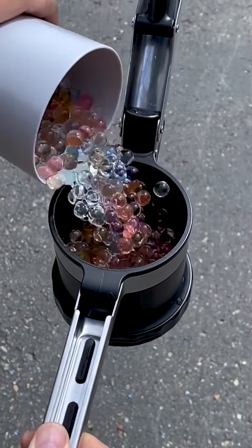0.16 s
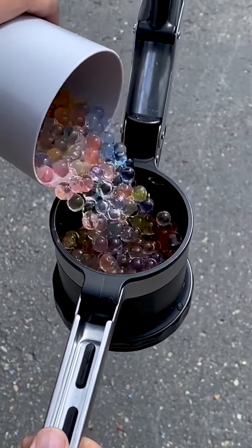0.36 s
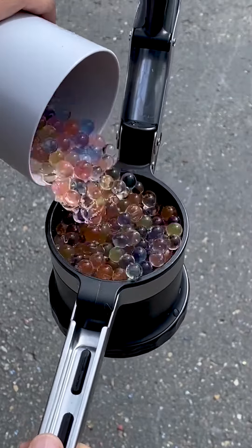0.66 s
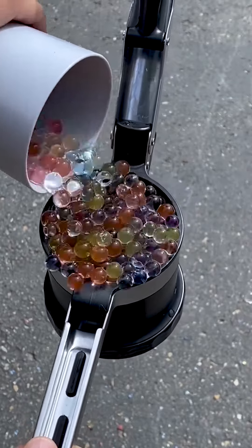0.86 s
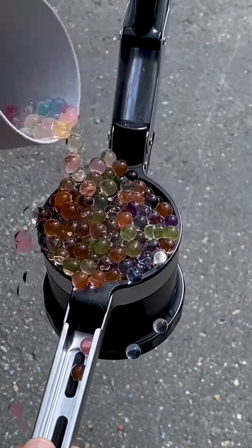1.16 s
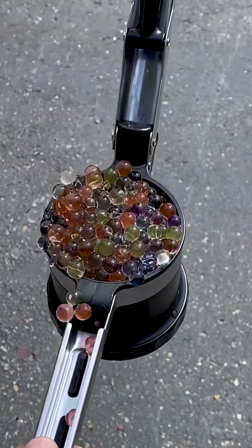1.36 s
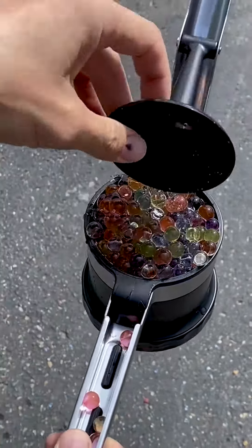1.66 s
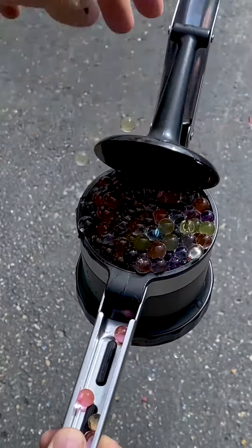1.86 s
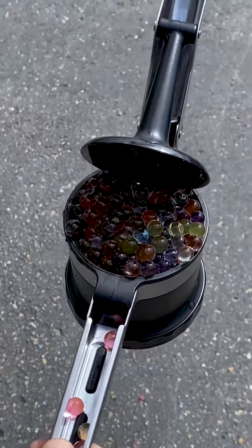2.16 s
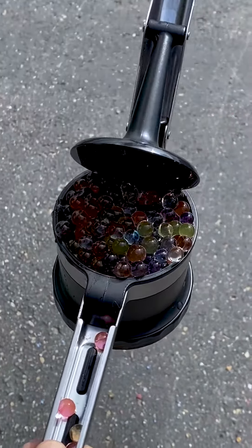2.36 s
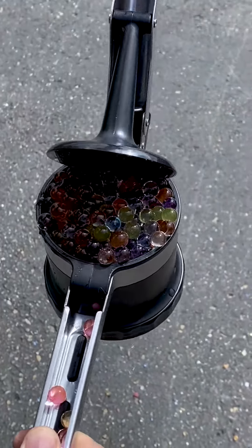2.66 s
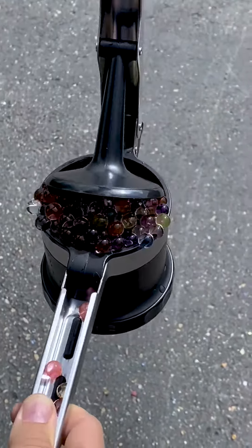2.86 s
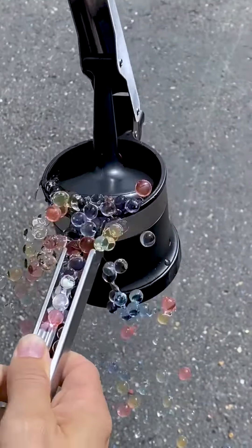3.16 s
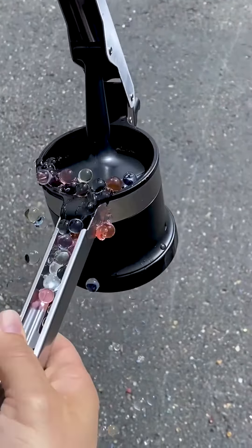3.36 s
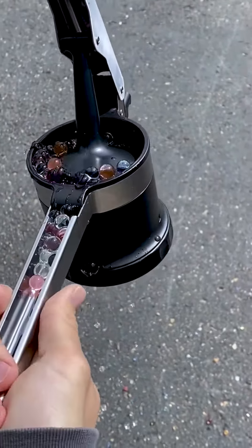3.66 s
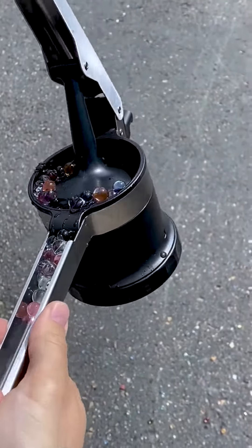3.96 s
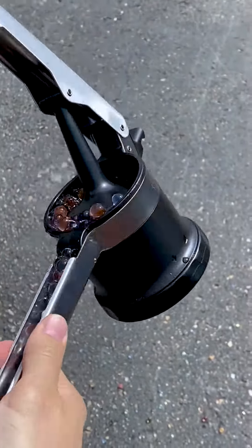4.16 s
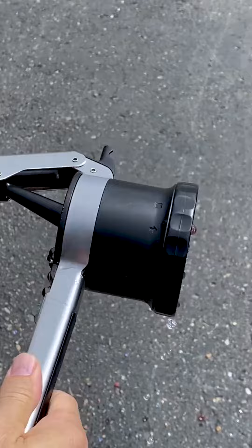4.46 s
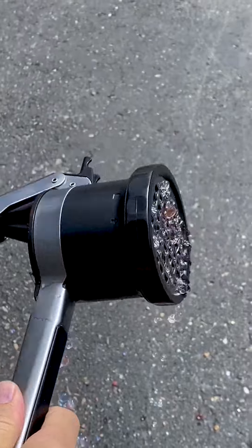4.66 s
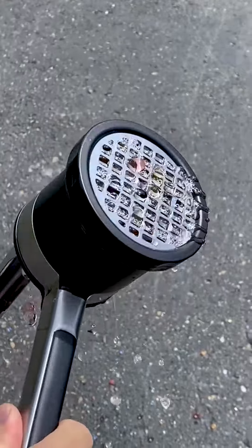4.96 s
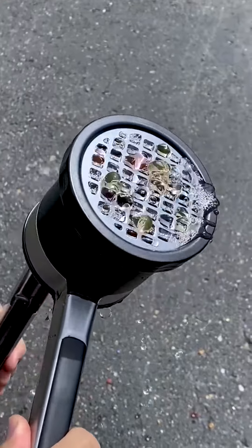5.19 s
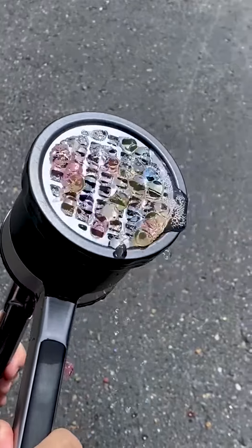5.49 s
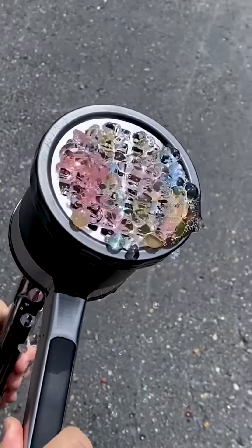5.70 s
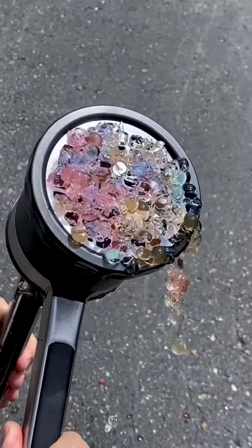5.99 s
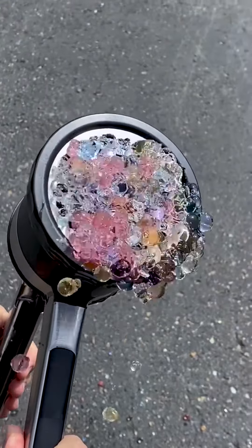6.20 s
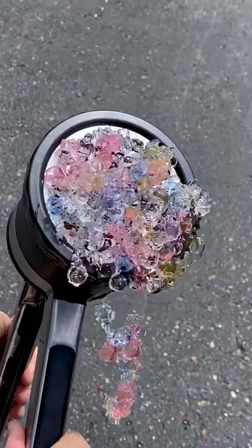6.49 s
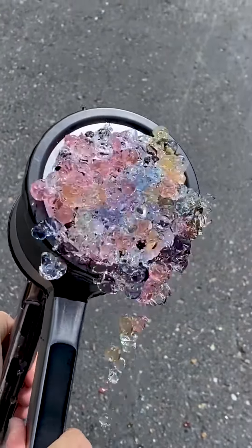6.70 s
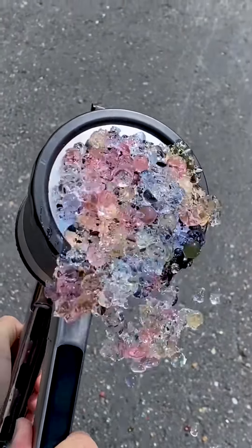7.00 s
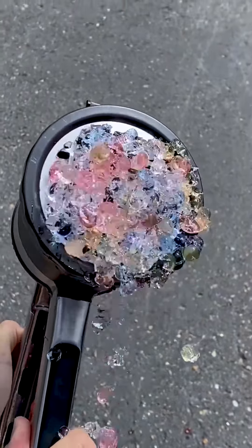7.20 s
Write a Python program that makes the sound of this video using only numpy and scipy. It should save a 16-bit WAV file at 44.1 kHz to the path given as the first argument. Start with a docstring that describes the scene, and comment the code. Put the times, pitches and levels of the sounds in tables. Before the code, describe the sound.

Close-up outdoors: a brief rattling pour of slick beads, a plastic knock, a small spill, then dense wet crackling and sharp snaps as they are squeezed.

```python
"""Wet gel beads are poured from a cup into a hand press, outdoors, close to a phone: ticks, pops and plops
over rumble and a far wash. A faint bird whistles and low thuds sound; the plunger knocks into place and
spills some beads. Then the rest are forced through the sieve and burst with a dense crackle and sharp pops.
Beads are swarms of damped bubbles; pops are noise bursts; knocks ring the press; rumble and air are noise."""
import sys
import numpy as np
from scipy import signal
from scipy.fft import rfft, irfft
from scipy.io import wavfile
from scipy.ndimage import uniform_filter1d

SR = 44100
rng = np.random.default_rng(int(sys.argv[2]) if len(sys.argv) > 2 else 0)


def wav_out(sig):
    """Save sig, one row per channel (or a flat mono array), as 16-bit PCM at SR to the path in sys.argv[1]."""
    wavfile.write(sys.argv[1], SR, np.round(np.clip(np.atleast_2d(sig).T, -1, 1) * 32767).astype(np.int16))


N = 323694
HZ = np.fft.rfftfreq(N, 1 / SR)
T = np.arange(N) / SR

# Loose beads on the move: poured, jostled by the plunger, spilling over the rim.
# Each row: start in seconds, length in seconds, wet body in relative dB, fine ticks in relative dB.
FLOWS = [(0, 0.13, -72, -64), (.11, 0.62, -51, -54), (.8, .14, -59, -63.5), (.96, 0.099, -75.5, -72),
         (1.36, 0.16, -68.5, -66.5), (1.84, 0.22, -75, -81), (2.25, 0.2, -83, -77),
         (2.85, 0.28, -70.5, -70.5), (3.12, .21, -61, -60), (3.36, 0.26, -64, -68), (4.5, 0.064, -68, -79)]
FLOW_RISE, FLOW_FALL = 0.21, 0.11  # shares of a flow's length
SETTLING_DB = -87  # beads shifting at rest
# Colours of loose and of crushed beads. Each row: frequency in Hz, relative density in dB per Hz.
POUR_COLOUR = [(500, -57), (900, -5), (1250, 4), (2000, 4), (2900, 7.5), (4000, -1.5), (5600, 0.5),
               (7600, -5), (11000, -2), (13000, -11.5), (16000, -7)]
CRUSH_COLOUR = [(500, -21), (1000, -15.5), (1600, -5), (2600, 1.5), (4000, -0.5), (5600, 0), (7600, -2),
                (11000, -5.5), (13000, -6), (16000, -10)]
# Colour of the fine hiss. Each row: frequency in Hz, relative density in dB per Hz.
FIZZ_COLOUR = [(1000, -25), (2500, -4), (5500, -3), (7600, -4.5), (11000, -3.5), (15000, -1.5)]

# Buffeting in light air and in heavy gusts. Each row: frequency in Hz, relative density in dB per Hz.
RUMBLE_COLOUR = [(15, -28), (30, -15), (48, -1), (85, 1), (115, -8), (170, -16.5), (260, -27), (500, -50),
                 (1000, -86)]
GUST_COLOUR = [(15, -31), (30, -4.5), (48, -1.5), (70, 0), (100, -8), (150, -25.5), (260, -32), (1000, -99)]
# Depth of the buffeting. Each row: time in seconds, share from 0 (light air) to 1 (heavy gusts).
GUSTY = [(0, 0.13), (1.3, 0.32), (2.3, .55), (3.4, 0.04), (4.4, .04), (5.1, 0.51), (6.5, .95), (7.34, 0.92)]
# Gusts buffeting the microphone. Each row: start in seconds, length in seconds, level in dB.
GUSTS = [(1.2, .12, -59), (1.35, 0.16, -51), (1.64, .1, -48.5), (1.78, 0.11, -53.5), (1.96, .18, -45),
         (2.24, .18, -43.5), (2.87, .15, -61.5), (3.67, .25, -55.5), (5.07, 0.23, -56), (5.43, 0.14, -55),
         (6.43, .15, -48), (6.72, 0.13, -55.5), (6.94, 0.082, -52.5), (7.1, 0.19, -54.5)]
GUST_RISE, GUST_FALL, CALM_DB = 0.34, 0.23, -64.5  # shares of a gust's length; the air between gusts

# Level of the distant outdoors. Each row: time in seconds, relative level in dB.
AIR = [(0.0, -78.5), (0.31, -80.5), (2.41, -76), (2.51, -71.5), (3.0, -78), (3.49, -79), (3.64, -71),
       (4.17, -77), (7.34, -78)]
# Colour of the distant outdoors. Each row: frequency in Hz, relative density in dB per Hz.
AIR_COLOUR = [(60, -15.5), (200, 8.5), (400, 4.5), (700, 3), (1100, 0.5), (1600, -8.5), (2500, -11),
              (5000, -18), (8000, -30), (15000, -22)]

# The loudest beads that snap or burst.
# Each row: time in seconds, level in dB as if spread over 1 ms, cavity pitch in Hz, nominal length in ms.
POPS = [(.1106, -35.5, 6000, 1.4), (.1532, -35.5, 3200, 2.4), (.16, -31.5, 4600, 1.8),
        (.2298, -38, 2620, 2.6), (.2887, -34.5, 2620, 2), (.3329, -28, 9050, .9), (.709, -36, 2900, 2.8),
        (.7746, -35, 2970, 3.8), (.8, -35, 5020, 3.5), (1.207, -48, 8500, 2.4), (1.505, -47.5, 3720, 1.6),
        (1.8694, -42, 5600, .4), (2.2235, -47, 8000, .3), (2.3814, -43, 8500, .2), (2.395, -44, 8000, .3),
        (2.459, -44, 9000, 0.3), (2.616, -53.5, 2700, 0.71), (3.09, -37.5, 5500, 0.3),
        (3.1041, -33, 4960, .65), (3.3, -45, 2720, 2.3), (3.3417, -40, 6000, 1.2),
        (3.5387, -32.5, 5770, 0.64), (3.6094, -32, 5030, 0.48), (3.7263, -32, 4760, 2.9),
        (3.7734, -36, 5500, 0.62), (3.862, -41, 5460, 0.54), (3.9093, -30.5, 5550, 0.59),
        (3.9593, -39.5, 8500, .4), (4.0064, -33, 5550, 0.74), (4.065, -38, 6500, .25),
        (4.168, -46.5, 7000, 0.49), (4.2828, -33.5, 5700, 0.4), (4.6289, -35.5, 6000, 1.1),
        (4.6614, -40.5, 7500, .6), (4.7365, -37, 5000, 0.95), (4.8015, -30.5, 7000, 1.2),
        (4.8095, -32, 7000, 1), (4.866, -29.5, 7500, 0.95), (4.9446, -29.5, 7000, .8),
        (5.064, -31, 7000, 0.72), (5.0677, -20.5, 7000, .63), (5.1706, -30.5, 6560, .5),
        (5.322, -34, 3930, 0.54), (5.3576, -30.5, 5050, 1.8), (5.4088, -28, 5540, 2.4),
        (5.4315, -27, 5470, 4.3), (5.5607, -34, 2830, 2.5), (5.5873, -30, 7500, .45),
        (5.6637, -25, 7000, 1), (5.8669, -17.5, 7500, 1.6), (5.8714, -16.5, 4180, 0.75),
        (5.939, -32, 2200, 1.1), (5.9424, -22, 6850, 1.8), (6.019, -32, 3840, 2.8),
        (6.0605, -26.5, 5600, .8), (6.1849, -22.5, 7940, 2.5), (6.214, -31.5, 5230, 0.79),
        (6.2456, -26, 6000, 2.1), (6.2746, -28.5, 4170, 2.8), (6.3542, -26, 5900, .4),
        (6.4622, -23, 9000, 3.4), (6.5095, -34, 3600, 4), (6.5162, -22, 7040, 1),
        (6.7336, -32.5, 5030, 2.2), (6.82, -28, 7600, 0.27), (6.9867, -30, 3900, 0.2),
        (7.0014, -17, 2620, 2.6), (7.0026, -18.5, 4410, 3.2), (7.0406, -26, 5800, .63),
        (7.2537, -32, 3300, 1.4), (7.2674, -22.5, 2060, .7)]
# Higher-pitched beads put more of their burst into spray: pitch of equal shares, and slope.
EVEN_SPRAY_HZ, SPRAY_DB_PER_HZ = 5960, 0.01
STRAYS_PER_S, STRAY_HZ, STRAY_OCTAVES, STRAY_MS = 19, 6200, 0.45, 0.5
STRAY_DB, STRAY_SPREAD_DB, STRAY_LEAST_DB = 13, 2.5, -65  # above the stir; random spread; floor
# Air pockets closing between wet beads.
# Each row: time in seconds, relative level in dB, starting pitch in Hz, t60 in seconds.
PLOPS = [(.133, -35, 3870, 0.013), (.2622, -23, 1085, .033), (.3165, -32, 1150, 0.024),
         (.41, -31.5, 4070, 0.017), (.449, -17.5, 1140, .013), (.462, -19, 1720, .0097),
         (.4785, -20, 1366, 0.024), (.519, -31.5, 1970, .023), (.523, -28, 1390, 0.013),
         (.666, -41, 1220, .027), (.738, -38.5, 1195, 0.024), (.832, -29, 2830, 0.011),
         (.892, -35, 4180, .013), (4.213, -39.5, 3400, .012), (6.024, -32, 2440, .031),
         (6.155, -32.5, 3680, .022), (6.2885, -29.5, 1000, .015), (6.389, -31.5, 3000, .012)]

# A faint, far bird.
# Each row: start in seconds, length in seconds, mean level in dB, first pitch in Hz, last pitch in Hz.
BIRD = [(1.16, .08, -80.5, 4500, 4550), (1.255, 0.08, -80, 4500, 4490), (1.37, 0.1, -78, 4560, 4570),
        (1.55, 0.15, -82, 4510, 4410), (1.8, .06, -80, 4950, 4600), (1.93, .05, -77, 5150, 4800),
        (2.068, .06, -78, 5100, 4700)]
# Dull bumps. Each row: time in seconds, relative level in dB, starting pitch in Hz, t60 in seconds.
THUDS = [(1.38, -21.5, 88.5, 0.15), (1.435, -26, 153, 0.084), (1.452, -22.5, 53, 0.12),
         (1.988, -31, 146, 0.11), (2.052, -25, 53.8, 0.29), (2.056, -25, 107.3, 0.14),
         (3.705, -42, 209.8, 0.56), (3.70, -49, 290, .2), (3.785, -55, 82.7, 0.4), (6.97, -33.5, 58, 0.23)]
# The plunger meets the rim. Each row: time in seconds, relative level in dB, nominal contact time in ms.
KNOCKS = [(1.85, -57, .1), (1.9041, -26, 0.075), (1.989, -37.5, .15), (2.016, -41, 0.074),
          (2.029, -50.5, 0.3), (2.651, -46, 0.47)]
# Modes of the press. Each row: frequency in Hz, relative level in dB, t60 in seconds.
PRESS = [(443, -17.5, 0.066), (710, -10.5, 0.05), (1086, 2, 0.032), (1295, -16, 0.22), (1433, -7, 0.032),
         (1716, 0, 0.028), (1770, -32, 0.31), (2336, -27, 0.17), (2370, -8, 0.069), (2620, -6, 0.03),
         (3180, -2, 0.016), (4200, -10, 0.015), (4910, -11, 0.02), (5300, -0.5, 0.015), (6700, -1, 0.0049),
         (10500, 4, 0.0038)]

# The squeeze, as the steady crackle that it drives. Each row: time in seconds, relative level in dB.
EFFORT = [(3.4, -70), (3.55, -66.5), (3.76, -62), (3.86, -64), (4.15, -72), (4.32, -84), (4.55, -85),
          (4.72, -72.5), (4.85, -67), (4.93, -59.5), (5.46, -54), (5.83, -52.5), (6.08, -51), (6.33, -49.5),
          (6.53, -54.5), (7.33, -54)]
EFFORT_TICKS_DB, EFFORT_BODY_DB = 2, -4.5  # relative to the effort
SLIP_DB, SLIPS_PER_S = 1.8, 24  # the beads yield in uneven slips
# A layer of beads gives way in one wet squelch.
# Each row: start in seconds, length in seconds, relative level in dB.
SQUELCHES = [(4.72, 0.22, -60), (5.0, 0.16, -55.5), (5.385, 0.062, -46.5), (5.54, 0.049, -48.5),
             (5.865, .05, -46), (5.935, .025, -44), (5.995, 0.042, -48.5), (6.15, 0.033, -54),
             (6.28, .05, -50), (6.49, 0.036, -49), (6.71, 0.15, -54), (6.9, 0.12, -51), (7.255, .08, -51)]
SQUELCH_RISE, SQUELCH_FALL = 0.21, 0.2  # shares of a squelch's length
SQUELCH_TICKS_DB = -1.5  # relative to its body

# Phase between the microphone ports. Each row: frequency in Hz, nominal lead of the left in radians.
PORTS = [(0, 2), (1400, 0.11), (2700, 0.27), (3700, 0.36), (4650, 1.35), (5400, -0.98), (7060, 3),
         (8180, 3.5), (10400, 7), (11600, 7.5), (14400, 9.5), (16000, 11)]
EDGE_HZ = 16000


def amp(db):
    """Decibels to gain."""
    return 10 ** (np.asarray(db) / 20)


def unit(x):
    """Scales to energy 1."""
    return x / np.sqrt(np.sum(x ** 2) + 1e-30)


def together(a_db, b_db):
    """The level of two unrelated sounds at once."""
    return 10 * np.log10(amp(a_db) ** 2 + amp(b_db) ** 2)


def read(points, hz):
    """Reads a spectrum on a log-frequency axis."""
    f, value = np.transpose(points)
    return np.interp(np.log(hz + 1), np.log(f + 1), value)


def follow(rows):
    """A curve of (time, value) rows, at every sample."""
    return np.interp(T, *np.transpose(rows))


def swells(rows, rise, fall, axis=2):
    """Level in dB of events that rise, hold and die away, in times proportional to their length."""
    power = np.full(N, 1e-14)
    for row in rows:
        age = (T - row[0]) / row[1]
        shape = np.clip(age / rise, 0, 1) * np.exp(-np.maximum(age - 1, 0) / fall)
        power += (amp(row[axis]) * shape) ** 2
    return 10 * np.log10(power)


def add(mix, s, sound):
    """Places a sound at its time, cut at the end."""
    part = mix[max(round(s * SR), 0):][:len(sound)]
    part += sound[:len(part)]


def noise(colour):
    """Coloured noise of rms 1."""
    spectrum = rfft(rng.standard_normal(N)) * amp(read(colour, HZ))
    return np.sqrt(N) * unit(irfft(spectrum, N))


def drift(per_s):
    """A random wander of about unit size, with straight lines between random points."""
    return np.interp(T * per_s, np.arange(4000), rng.standard_normal(4000))


def ring(t, hz, t60, rise_s, glide=0):
    """A damped vibration with a soft start, whose pitch may climb or fall as it dies."""
    envelope = (1 - np.exp(-t / rise_s)) * np.exp(-np.log(1000) * t / t60)
    return envelope * np.sin(2 * np.pi * hz * t * (1 + glide * t / t60))


def rings(rows, rise_s, glide, level_db):
    """One damped vibration for each row."""
    out, t = np.zeros(N), np.arange(SR // 2) / SR
    for s, db, hz, t60 in rows:
        add(out, s, amp(db + level_db) * ring(t, hz, t60, rise_s, glide))
    return out


def band(x, low_hz, high_hz, order=2):
    """A causal band-pass."""
    edges_hz = [low_hz, min(high_hz, SR * .45)]
    return signal.sosfilt(signal.butter(order, edges_hz, "band", fs=SR, output="sos"), x)


def beads(body_db, ticks_db, colour, per_s, cycles, clump_db, sharp_share, spread_db=4.5, count=44):
    """Countless wet contacts: most are tiny bubbles with one pitch each, some sharp ticks excite many."""
    out, t = np.zeros(N), np.arange(900) / SR
    pitches_hz = np.geomspace(700, 16000, count)
    power = amp(read(colour, pitches_hz)) ** 2 * pitches_hz
    high = pitches_hz > 4000
    power /= np.where(high, power[high].sum(), power[~high].sum())

    at, place, size, sign, kind = rng.random((int(per_s * N / SR), 5)).T
    at = (at * (N - 1)).astype(int)
    place = place ** .6  # high pitches far outnumber low ones
    avalanche = amp(clump_db * np.clip(drift(170), -2, 1.6))
    size = amp(spread_db * np.minimum(-np.log(size + 1e-9), 3.5)) * np.sign(sign - .5) * avalanche[at]
    breadth = np.where(kind < sharp_share, 7., .45)  # in pitch steps: sharp tick, or bubble
    for k, hz in enumerate(pitches_hz):
        distance = place * (count + 4) - 2 - k
        reach = np.exp(-(distance / breadth) ** 2) / breadth ** .3 * rng.choice([-1, 1], len(at))
        # low pitches follow the wet body, high ones the ticking
        ticking = np.interp(np.log(hz), np.log([3300, 4800]), [0, 1])
        level = amp(ticking * (ticks_db[at] - body_db[at]) + body_db[at])
        clicks = np.bincount(at, unit(size * reach) * level, N) * np.sqrt(N * power[k])
        bubble = ring(t, hz, min(cycles / hz, .02), 2.1 / hz, glide=rng.uniform(-0.046, 0.27))
        out += signal.oaconvolve(clicks, unit(bubble))[:N]
    return out


def pour(body_db, ticks_db):
    """Loose beads touch often, mostly as single-pitched bubbles that ring for many cycles."""
    return beads(body_db - 1.5, ticks_db + 1, POUR_COLOUR, per_s=4600, cycles=33, clump_db=2.3,
                 sharp_share=0.05)


def fizz(ticks_db, level_db=-8, flicker_db=3):
    """Water forced between the beads hisses finely, in step with the level of their ticking."""
    return noise(FIZZ_COLOUR) * amp(ticks_db + level_db + flicker_db * drift(110))


def rumble(apart_db=-23):
    """Low buffeting that swells in gusts, its colour following GUSTY, nearly alike on both sides."""
    gusty = np.clip(follow(GUSTY), 0, 1)
    x = np.sqrt(1 - gusty) * noise(RUMBLE_COLOUR) + np.sqrt(gusty) * noise(GUST_COLOUR)
    x /= np.sqrt(uniform_filter1d(x ** 2, size=6000) + 0.055)  # evens out chance swells
    side = amp(apart_db) * noise(RUMBLE_COLOUR)
    level_db = together(swells(GUSTS, GUST_RISE, GUST_FALL), CALM_DB)
    return np.array([x + side, x - side]) * amp(level_db)


def outdoors(level_db=2, apart=0.58):
    """Far-off wash: coloured noise, partly different on each side."""
    common, side = noise(AIR_COLOUR), noise(AIR_COLOUR)
    return amp(follow(AIR) + level_db) * np.array([common + apart * side, common - apart * side])


def strays(stir_db):
    """Rows of lesser pops at random moments, stronger as the beads are stirred more."""
    rows = []
    for at, size, pitch, length in rng.random((int(STRAYS_PER_S * N / SR), 4)):
        db = together(stir_db[int(at * N)] + STRAY_DB, STRAY_LEAST_DB)
        db += STRAY_SPREAD_DB * min(-np.log(size), 2)
        hz = STRAY_HZ * 2 ** (STRAY_OCTAVES * (2 * pitch - 1))
        rows.append((at * N / SR, db, hz, STRAY_MS * 2 ** (2 * length - 1)))
    return rows


def pops(rows, width=1.124, spray_hz=7600, splash_db=-18, splash_s=0.027, decay=0.96,
         cavity_db=-3.5, cavity_life=4.6):
    """A bead splits in tiny tears that ring its cavity and throw fine spray; a wet splash outlasts them."""
    out, t = np.zeros(N), np.arange(2048) / SR
    for s, db, hz, ms in rows:
        lean_db = SPRAY_DB_PER_HZ * (hz - EVEN_SPRAY_HZ)
        tears, clump, splash = rng.standard_normal((3, len(t)))
        length_s = max(ms, .2) / 1000
        split = unit(tears * np.exp(0.17 * clump) * np.exp(-(t / (2 * decay * length_s)) ** 2))
        drive = split + amp(splash_db) * unit(splash * np.exp(-t / splash_s))
        body = band(band(drive, hz / width, hz * width, order=1), max(hz * 0.27, 1200), 6170)
        # the hollow left by the bead rings on, longer after a slow split
        cavity = ring(t, hz, cavity_life * length_s + 6 / hz, length_s / 2, glide=-0.039)
        body = unit(body) + amp(cavity_db) * unit(cavity)
        spray = band(drive, spray_hz, 18600)
        burst = unit(body) + amp(lean_db) * unit(spray)
        add(out, s - .0002, np.sqrt(SR / 1000) * amp(db - together(0, lean_db)) * burst)
    return out


def plops():
    """Closing air pockets ring as damped bubbles whose pitch climbs."""
    return rings(PLOPS, rise_s=0.0032, glide=0.093, level_db=2.5)


def bird(waver_hz=25, flutter_db=2.5):
    """Thin whistles: short gliding sines, wavering in pitch and level."""
    out = np.zeros(N)
    for s, length_s, db, first_hz, last_hz in BIRD:
        size = int(length_s * SR)
        hz = np.linspace(first_hz, last_hz, size) + waver_hz * drift(120)[:size]
        level = amp(db + flutter_db * drift(90)[:size]) * signal.windows.tukey(size, .5)
        add(out, s, level * np.sin(2 * np.pi * np.cumsum(hz) / SR))
    return out


def thuds():
    """Dull bumps: slow-starting damped vibrations whose pitch falls."""
    return rings(THUDS, rise_s=0.015, glide=-.05, level_db=-3)


def knocks(level_db=-1, rattle=0.83, rattle_s=0.0092, clack_db=-4, clack_s=0.0032):
    """A short push and a little rattle ring the modes of the press, over the dense clack of its plastic."""
    out, t = np.zeros(N), np.arange(SR // 3) / SR
    body = sum((-1) ** k * amp(db) * ring(t, hz, t60, .0001) for k, (hz, db, t60) in enumerate(PRESS))
    for s, db, ms in KNOCKS:
        push = unit(np.exp(-t * 1000 / (ms / 2)))
        blow = push + rattle * unit(rng.standard_normal(len(t)) * np.exp(-t / rattle_s))
        clack = band(rng.standard_normal(len(t)) * np.exp(-t / clack_s), 480, 9200)
        clack = band(clack, 380, 2700, order=1)
        sound = unit(signal.fftconvolve(blow, body)[:len(t)]) + amp(clack_db) * unit(clack)
        add(out, s, amp(db + level_db) * np.sqrt(SR / 1000) * sound)
    return out


def crush(body_db, ticks_db):
    """Squeezed beads burst in clumps, with more sharp ticks and shorter bubbles than loose ones."""
    return beads(body_db - 3, ticks_db + 1, CRUSH_COLOUR, per_s=1800, cycles=21.5, clump_db=4.5,
                 sharp_share=.25)


def ports(x, spread=0.092):
    """Near sound meets the two ports with a phase lead set by frequency, wandering between two extremes."""
    lead = np.interp(HZ, *np.transpose(PORTS)) * np.array([[.5], [-.5]])
    spectrum = rfft(x)
    one_edge = irfft(spectrum * np.exp(1j * lead * (1 - spread)), N)
    other_edge = irfft(spectrum * np.exp(1j * lead * (1 + spread)), N)
    place = (1 + np.tanh(2 * drift(200))) / 2
    return place * one_edge + (1 - place) * other_edge


def yard(x, wet_db=-24, t60=0.11, press_db=-20, press_t60=0.0098):
    """Quick scatter off the press and hands, and a faint tail from the ground; unlike on each side."""
    t = np.arange(SR // 4) / SR
    sides = []
    for _ in range(2):
        tail = rng.standard_normal(len(t)) * np.exp(-np.log(1000) * t / t60) * (t > .004)
        early = rng.standard_normal(len(t)) * np.exp(-np.log(1000) * t / press_t60)
        echo = amp(wet_db) * unit(band(tail, 270, 5700, order=1))
        echo += amp(press_db) * unit(band(early, 2000, 12700, order=1))
        sides.append(signal.oaconvolve(x, echo)[:N])
    return np.array(sides)


def scene():
    """Beads and press close by, over thuds, rumble, the outdoor wash and a bird."""
    flow_body_db = together(swells(FLOWS, FLOW_RISE, FLOW_FALL, axis=2), SETTLING_DB)
    flow_ticks_db = together(swells(FLOWS, FLOW_RISE, FLOW_FALL, axis=3), SETTLING_DB)
    effort_db = np.where(T < EFFORT[0][0], -140, follow(EFFORT))
    effort_db = effort_db + SLIP_DB * drift(SLIPS_PER_S)
    squelch_db = swells(SQUELCHES, SQUELCH_RISE, SQUELCH_FALL)
    crush_body_db = together(effort_db + EFFORT_BODY_DB, squelch_db)
    crush_ticks_db = together(effort_db + EFFORT_TICKS_DB, squelch_db + SQUELCH_TICKS_DB)
    stir_db = together(flow_ticks_db, crush_ticks_db)

    near = pour(flow_body_db, flow_ticks_db) + fizz(stir_db)
    near += pops(list(POPS) + strays(stir_db)) + plops()
    near += knocks() + crush(crush_body_db, crush_ticks_db)
    return ports(near) + yard(near) + rumble() + outdoors() + bird() + thuds()


def record(dry, top_db=-3.5):
    """The microphone dulls the highest treble; then the band limit."""
    colour = amp(top_db * np.clip((HZ - 11500) / 2500, 0, 1))
    dulled = irfft(rfft(dry) * colour, N)
    low_pass = signal.firwin(511, EDGE_HZ, window=("kaiser", 8), fs=SR)
    return signal.oaconvolve(dulled, low_pass[None], "same")


dry = scene()
out = record(dry)
wav_out(out)
```